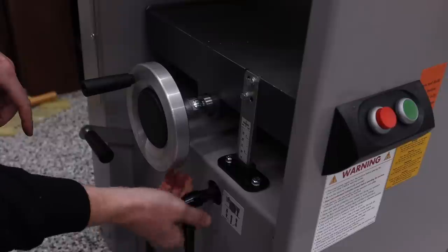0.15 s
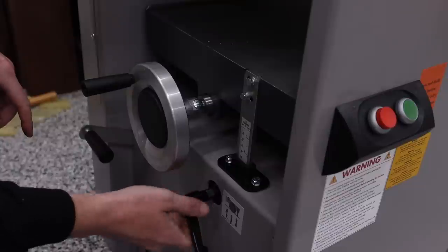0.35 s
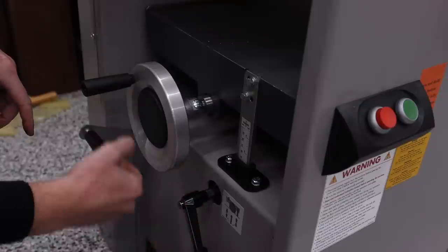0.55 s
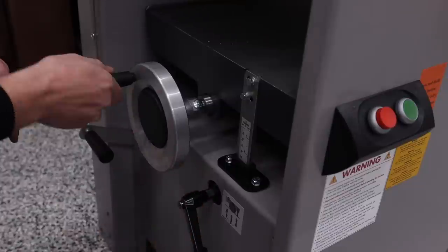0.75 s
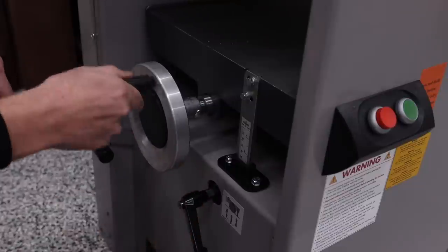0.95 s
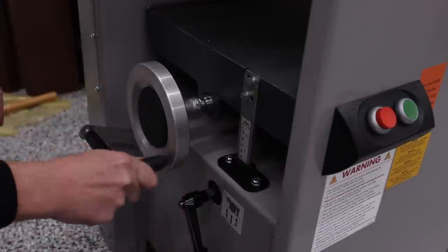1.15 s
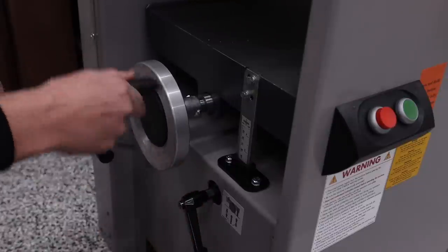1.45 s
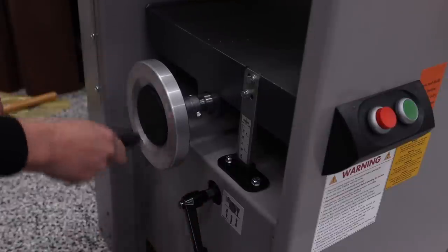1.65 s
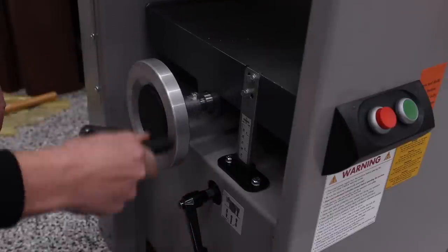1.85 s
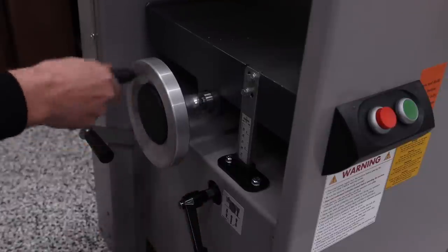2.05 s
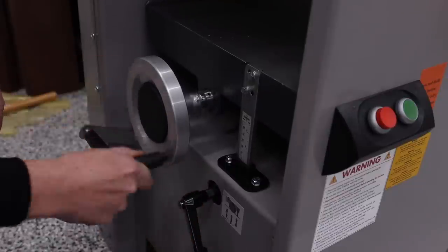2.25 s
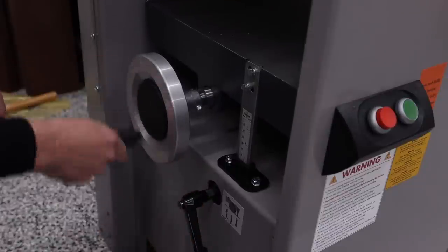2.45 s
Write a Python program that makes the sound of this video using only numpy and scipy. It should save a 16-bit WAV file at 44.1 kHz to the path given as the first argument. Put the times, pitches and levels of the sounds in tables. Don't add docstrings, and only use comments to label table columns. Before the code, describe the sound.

A metal lever snaps home with a bright crack, then a hand wheel is cranked, ticking and thudding.

```python
import sys
import numpy as np
from scipy import signal
from scipy.fft import rfft, irfft, next_fast_len
from scipy.io import wavfile
from scipy.ndimage import map_coordinates

SR = 44100
rng = np.random.default_rng(int(sys.argv[2]) if len(sys.argv) > 2 else 0)


def persist_wave(psi):
    counts = np.round(np.clip(psi, -1, 1) * 32767).astype(np.int16)
    wavfile.write(sys.argv[1], SR, np.atleast_2d(counts).T)


def nominal_scale(level):
    x = np.asarray(level, float) / 20
    return 10 ** x


N = 114660


def unit(x):
    return x / np.sqrt(np.mean(x ** 2) + 1e-20)


def along(points, hz):
    f, v = np.transpose(points)
    return np.interp(np.log(hz + 1), np.log(f + 1), v)


def curve(rows):
    s, v = np.transpose(rows)
    return np.interp(np.arange(N) / SR, s, v)


def wobble(rate):
    knots = rng.standard_normal(int(N * rate / SR) + 4)
    return map_coordinates(knots, [np.arange(N) * rate / SR])


def filtered(x, response):
    m = next_fast_len(len(x) + SR // 4)
    return irfft(rfft(x, m) * response(np.fft.rfftfreq(m, 1 / SR)), m)[:len(x)]


def peaks(table):
    def response(f):
        total = 0
        for k, (centre, width, db) in enumerate(table):
            total = total + (-1) ** k * nominal_scale(db) * 1j * f * width / (centre ** 2 - f * f + 1j * f * width)
        return total
    return response


def sharp_peaks(table):
    return lambda f: peaks(table)(f) ** 2


def colour(points):
    return lambda f: nominal_scale(along(points, f))


def noise(response, size=N):
    return unit(filtered(rng.standard_normal(size), response))


def ring(modes, rise_s, spread_db):
    t = np.arange(SR // 2) / SR
    hz, db, t60 = np.transpose(modes)[:, :, None]
    luck = rng.standard_normal((2, len(modes), 1))
    level = nominal_scale(db + spread_db * luck[0] - 60 * t / t60)
    tones = level * np.sin(2 * np.pi * hz * t + luck[1])
    return tones.sum(0) * (1 - np.exp(-t / rise_s))


def crack(response, t60):
    t = np.arange(SR // 2) / SR
    return noise(response, size=len(t)) * nominal_scale(-60 * t / t60) * (1 - np.exp(-t / 0.00043))


def shove(s, length, skew=.55):
    return np.sin(np.pi * np.clip((np.arange(N) / SR - s) / length, 0, 1) ** skew) ** 2


def add(track, s, x):
    track[round(s * SR):][:len(x)] += x


# f/Hz, level/dB
LEVER_TONES = [(3130, -5), (7690, 1.5), (8030, -6), (13870, -14.5)]
# f/Hz, level/dB
SNAP_COLOUR = [(400, -15), (1300, -9), (3000, 1), (5000, 2), (7000, 5), (9000, -21.5), (13500, -17),
               (16000, -34)]
# f/Hz, width/Hz, level/dB
RATTLE_PEAKS = [(1940, 1100, -14), (3450, 1700, -6), (4900, 590, -15.5), (5900, 150, -18), (7470, 1400, -1),
                (9750, 820, -7), (12560, 2200, -13.5), (13800, 250, -11.5), (13800, 520, -9.5)]
# f/Hz, width/Hz, level/dB
AFTER_RING = [(7700, 200, 0), (4840, 120, -6), (5750, 300, -5), (3140, 400, -3)]
# f/Hz, width/Hz, level/dB
TOP_RING = [(12450, 400, 0), (13900, 300, -1), (15300, 250, -1)]
# f/Hz, width/Hz, level/dB
FRAME = [(122, 18, 0)]
# t/s, level/dB
HAND_LEVEL = [
    (0, -57.5),
    (.1, -68.5),
    (.18, -78.5),
    (.2, -100),
    (2.6, -100),
]
# f/Hz, width/Hz, level/dB
HAND_COLOUR = [(490, 27, 12.5), (905, 260, 1), (1760, 320, -6.5), (2350, 67, -9), (3790, 500, -17),
               (5417, 50, -10.5)]


def lever():
    snap_s, snap_db = .2025, -7
    t, out = np.arange(N) / SR, np.zeros(N + SR)
    add(out, snap_s, nominal_scale(snap_db - 13) * crack(colour(SNAP_COLOUR), t60=0.083))
    add(out, snap_s, nominal_scale(snap_db - 6.5) * crack(peaks(RATTLE_PEAKS), t60=0.072))
    add(out, snap_s, nominal_scale(-40) * crack(sharp_peaks(AFTER_RING), t60=.6))
    add(out, snap_s, nominal_scale(-43.5) * crack(sharp_peaks(TOP_RING), t60=.32))
    add(out, snap_s, nominal_scale(-44) * crack(sharp_peaks(FRAME), t60=1))

    tones = sum(nominal_scale(snap_db + db) * np.sin(2 * np.pi * hz * t) for hz, db in LEVER_TONES)
    bite = shove(snap_s, length=.0078, skew=0.83) ** .5 * tones

    squeak_s, squeak_len_s = 0.19, 0.016
    squeak = np.exp(-((t - squeak_s) / squeak_len_s) ** 2) * noise(peaks([(11200, 90, 0), (11700, 90, -5)]))
    rub = nominal_scale(curve(HAND_LEVEL) + 1.1 * wobble(25)) * noise(peaks(HAND_COLOUR))
    return bite, out[:N] + nominal_scale(-80) * squeak + rub


# t/s, peak level/dB, crack level/dB, ring level/dB
HANDLE_CLAPS = [
    (0.7222, -20, -6, -39),
    (0.7255, -25, 1.5, -25),
    (0.729, -20, -20.5, -1),
]
# f/Hz, width/Hz, level/dB
HANDLE_PEAKS = [(1300, 330, -10.5), (3250, 580, 2.5), (4770, 970, 1.5), (6900, 730, 5.5),
                (10800, 1500, -33), (13600, 1400, -17.5)]
# f/Hz, level/dB, t60/s
HANDLE_RING = [(2600, 6.5, 0.03), (2665, -27, 0.72), (2594, -28, .5), (2549, -30, .4)]
# f/Hz, width/Hz, level/dB
HANDLE_BUZZ = [(2588, 190, 3), (3484, 470, -6), (4150, 510, -1.5), (4606, 550, 0.5), (4910, 295, 1.5),
               (5950, 310, -6), (7930, 200, -9), (9900, 1700, -15)]
# f/Hz, level/dB, t60/s
SHAFT_RING = [(840, -9, 0.041), (1254, -6.5, 0.036), (1655, -12, 0.03), (2625, -14, 0.04)]
# t/s, peak level/dB, shaft body level/dB, wheel ring level/dB
GEAR_TICKS = [(0.793, -34.5, 9.5, 3), (0.9752, -54, 12.5, -11), (1.358, -37.5, -6, 5.5),
              (1.4593, -39.5, 7, 6), (1.4813, -45, -11, -13), (1.577, -48.5, 14, 18), (1.616, -52, 21, -8),
              (1.673, -44, -12, 2), (1.7614, -51, 1, 15), (1.7996, -43, 9, 7.5), (1.939, -42.5, 16.5, 2),
              (1.946, -46, 17, 15), (2.0074, -50, -5, 14), (2.0944, -47, 12, 5), (2.1800, -44.5, 9, 1),
              (2.2346, -40.5, -2, 6), (2.2576, -41, 3, -9.5), (2.3694, -45.5, 14, -2),
              (2.4167, -39.5, 6, 9), (2.4303, -48, 6, -7), (2.439, -46, -6, -7), (2.245, -49, -3, -5),
              (2.5251, -53.5, -11.5, -11), (2.5474, -48.5, -1, 9), (2.5857, -48.5, 9, 13)]
# f/Hz, level/dB
GEAR_COLOUR = [(600, -34), (1300, 9), (2200, -4.5), (3300, -3), (5000, -16), (6500, -22), (10000, -30),
               (16000, -54.5)]
# f/Hz, width/Hz, level/dB
WHEEL_PEAKS = [(2715, 68, 9), (5000, 110, -4)]


def wheel():
    out, rim = np.zeros((2, N + SR))
    for s, db, crack_db, ring_db in HANDLE_CLAPS:
        clap = nominal_scale(crack_db) * crack(peaks(HANDLE_PEAKS), t60=0.024)
        clap += nominal_scale(ring_db) * ring(HANDLE_RING, rise_s=0.0034, spread_db=0.0)
        clap += nominal_scale(-27) * crack(sharp_peaks(HANDLE_BUZZ), t60=.6)
        clap += nominal_scale(-9.5) * ring(SHAFT_RING, rise_s=0.0014, spread_db=1.5)
        add(out, s, nominal_scale(db) * clap)
    for s, db, body_db, ring_db in GEAR_TICKS:
        tick = crack(colour(GEAR_COLOUR), t60=0.018)
        tick += nominal_scale(body_db - 2) * ring(SHAFT_RING, rise_s=0.0017, spread_db=1.5)
        add(out, s - .0004, nominal_scale(db - 4) * tick)
        add(rim, s, nominal_scale(db + ring_db - 23) * crack(sharp_peaks(WHEEL_PEAKS), t60=0.2))
    unsteady = nominal_scale(wobble(39) * 2.1 - 7.5)
    return out[:N] + rim[:N] * unsteady


# t/s, level/dB, length/s, low boom level/dB, panel note f/Hz
CABINET_THUDS = [(0.195, -24.5, 0.042, -4.5, 810), (0.224, -30.5, 0.064, -3, 862),
                 (0.25, -28.5, 0.029, 1.5, 335), (0.279, -33, 0.029, 3, 315),
                 (0.211, -27.5, 0.027, -10, 480), (0.722, -48.5, 0.096, 12, 690),
                 (0.796, -39, 0.036, 10.5, 740), (0.814, -43.5, 0.058, 2, 759),
                 (0.806, -43.5, 0.026, 3.5, 606), (1.476, -37.5, 0.013, 4, 460),
                 (1.481, -35, 0.036, 2, 715), (1.514, -39.5, 0.034, -7, 715), (1.571, -46, .03, -4, 715),
                 (1.812, -45.5, 0.066, 8, 712), (1.863, -45, 0.017, -9, 712), (2.14, -41, .018, 2.5, 500),
                 (2.148, -37, 0.028, 0, 720), (2.19, -40.5, 0.022, 6, 710), (2.252, -49, 0.037, 10.5, 720),
                 (2.351, -39, 0.025, 0.5, 710), (2.437, -37, 0.041, 4, 730),
                 (2.524, -36.5, 0.044, 0.5, 737)]
# f/Hz, width/Hz, level/dB
PANEL_PEAKS = [(610, 37, -12), (712, 36, 1), (745.6, 39.8, 1), (886.5, 41, -2.5), (1085.7, 110, -12),
               (1262, 100, -12.5), (1790, 220, -21), (3215, 1200, -34)]
# f/Hz, width/Hz, level/dB
BOOM_PEAKS = [(135, 75, -8), (195, 35, -3.5), (313.4, 35, -0.5), (410, 15, -1), (461.8, 110, -7)]
# f/Hz, width/Hz, level/dB
SNAP_PEAKS = [(871, 73, -6), (339.7, 20, 2), (389, 37, 3), (500, 67, -5.5), (645, 50, -12.5),
              (1431, 220, -11.5)]


def cabinet():
    t = np.arange(N) / SR
    push = np.array([nominal_scale(db) * shove(s, length) for s, db, length, _, _ in CABINET_THUDS])
    note_t60 = .04
    fade = nominal_scale(-60 / (note_t60 * SR))
    held = signal.lfilter([1 - fade], [1, -fade], push)
    note = sum(p * np.sin(2 * np.pi * (row[4] * t + rng.random())) for p, row in zip(held, CABINET_THUDS))

    def scrape(push_level, table):
        def response(f):
            soft = 1 / (1 + 1j * f / 3488) ** 2
            no_bass = (1j * f / (110 + 1j * f)) ** 2
            return peaks(table)(f) * soft * no_bass
        return filtered(nominal_scale(13.5) * push_level * rng.standard_normal(N), response)

    panel = push.sum(0)
    boom = nominal_scale(np.transpose(CABINET_THUDS)[3]) @ push
    box = scrape(panel, PANEL_PEAKS) + nominal_scale(2.0) * scrape(boom, BOOM_PEAKS)
    box += scrape(nominal_scale(3) * panel * (t < .5), SNAP_PEAKS)
    return nominal_scale(1.5 + wobble(70)) * note, box


# t/s, rumble level/dB
TURN_EFFORT = [
    (.95, -67.5),
    (1.3, -58.5),
    (1.55, -51),
    (1.72, -55.5),
    (1.9, -53),
    (2.15, -51.5),
    (2.6, -63),
]
# t/s, level/dB, length/s
GRIT_SLIPS = [(.795, -55.5, 0.054), (1.48, -58.5, 0.043), (1.57, -64.5, 0.063), (1.706, -70, 0.016),
              (1.82, -67.5, 0.03), (2.53, -66, 0.035), (1.935, -71.5, .03), (2.141, -67, 0.027),
              (2.352, -69.5, 0.027), (2.445, -72, 0.022)]
# f/Hz, width/Hz, level/dB
GRIT_COLOUR = [(1095, 520, 4.5), (1910, 950, 0), (3380, 1240, -6.5), (6720, 2000, -12.5),
               (9200, 1500, -14.5)]
# f/Hz, level/dB
RUB_COLOUR = [(300, -2), (900, -7.5), (1500, -10), (2500, -17.5), (6000, -24), (12000, -32.5)]
# f/Hz, width/Hz, level/dB
SING_PEAKS = [(2470, 18, -5.5), (4865, 65, -8.5)]


def screw():
    effort_db = curve([(0, -100), (.9, -100)] + list(TURN_EFFORT))

    def lumpy(response):
        return nominal_scale(effort_db + 2 * wobble(30) + wobble(8.3)) * noise(response)

    slips = sum(nominal_scale(db) * shove(s, length) for s, db, length in GRIT_SLIPS)
    grit = slips * noise(peaks(GRIT_COLOUR))
    rumble = lumpy(lambda f: peaks(BOOM_PEAKS)(f) / (1 + (f / 900) ** 2))
    panel = lumpy(lambda f: peaks(PANEL_PEAKS)(f) / (1 + (f / 1800) ** 2))
    rub = lumpy(colour(RUB_COLOUR))
    sing = lumpy(peaks(SING_PEAKS))
    return grit + rumble + nominal_scale(-8) * panel + nominal_scale(-14) * rub + nominal_scale(-25) * sing


# f/Hz, t60/s
ROOM_T60 = [(150, .6), (500, 0.57), (2000, 0.64), (6000, 0.41), (12000, 0.29), (16000, 0.12)]


def room(x):
    hz, _, z = signal.stft(rng.standard_normal(SR), SR, nperseg=256)
    t = np.arange(z.shape[1]) * 128 / SR
    tail = signal.istft(z * nominal_scale(-60 * t / along(ROOM_T60, hz)[:, None]), SR, nperseg=256)[1]
    late = np.pad(x, (260, 0))
    return signal.fftconvolve(late, tail / np.linalg.norm(tail))[:N]


# f/Hz, level/dB
HUM_TONES = [(59.2, -61.5), (118.4, -70)]
# f/Hz, level/dB
AIR_COLOUR = [(20, -33), (40, -18), (75, -1), (120, -4), (300, -4), (600, -22), (1200, -28.5),
              (2500, -48.5)]


def shop():
    t = np.arange(N) / SR
    hum = sum(nominal_scale(db + 4.0 + wobble(17)) * np.sin(2 * np.pi * hz * t) for hz, db in HUM_TONES)
    return hum + nominal_scale(-59.5 + 3.2 * wobble(0.79)) * noise(colour(AIR_COLOUR))


def scene():
    bite, snap = lever()
    crank = wheel()
    note, box = cabinet()
    echo = room(snap + nominal_scale(-9) * bite)
    echo += nominal_scale(2) * room(box + nominal_scale(-8) * note + nominal_scale(-11) * crank)
    machine = bite + snap + crank + note + box + screw()
    return (machine + nominal_scale(-11) * echo + shop())[None]


def roll_off(x):
    return signal.sosfilt(signal.butter(12, 16800, fs=SR, output="sos"), x)


# t/s, level/dB
RECORDER_GAIN = [
    (0, 0),
    (2.184, 2),
    (2.19, -2.5),
    (2.23, -13),
    (2.26, -4.5),
    (2.36, -0.5),
    (2.41, -7.5),
    (2.425, -4.5),
    (2.6, -5),
]
# f/Hz, level/dB
HISS_COLOUR = [(500, -2), (2000, -4), (5000, -5.5), (9000, -10.5), (15500, -18.5)]


def record(dry):
    gain_db = curve(RECORDER_GAIN)
    hiss = nominal_scale(-76.5 + np.maximum(2 * gain_db, -4.5)) * noise(colour(HISS_COLOUR))
    clipped = np.clip(dry[0] * nominal_scale(gain_db) + hiss, -.86, .86)
    top_hz, edge_hz, leak_db = 15880, 40, -38
    heard = filtered(clipped, lambda f: nominal_scale(leak_db) + (1 - np.tanh((f - top_hz) / edge_hz)) / 2)
    return roll_off(heard[None])


dry = scene()
out = record(dry)
persist_wave(out)
```